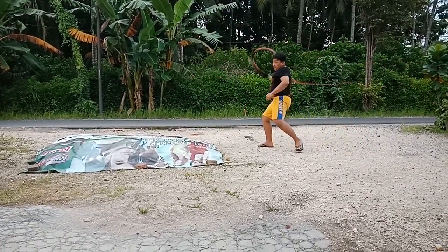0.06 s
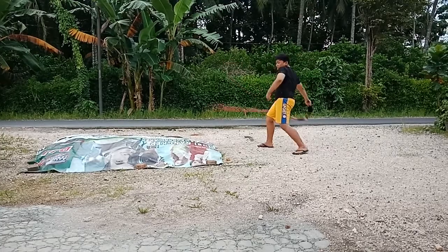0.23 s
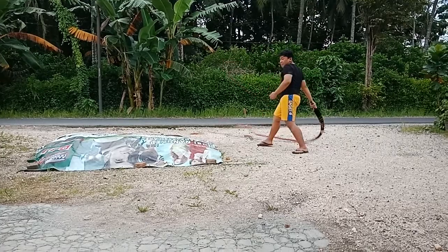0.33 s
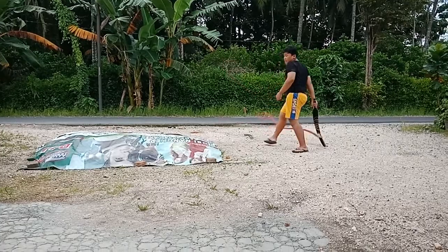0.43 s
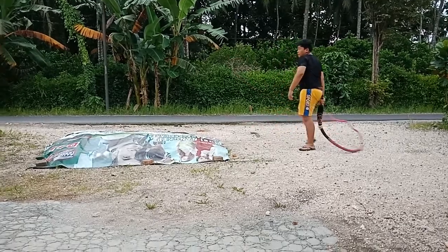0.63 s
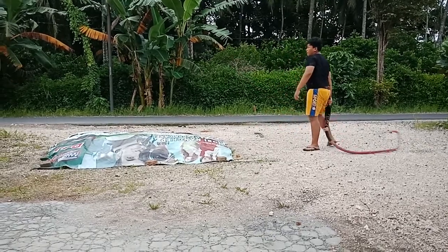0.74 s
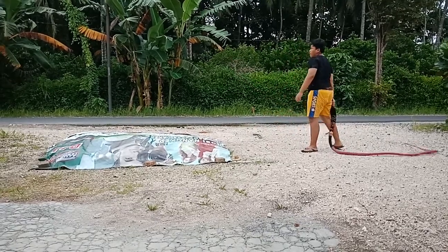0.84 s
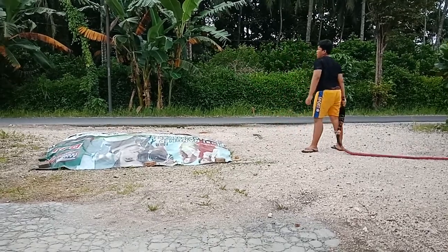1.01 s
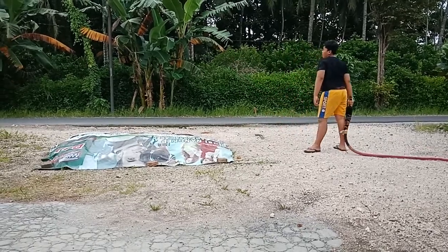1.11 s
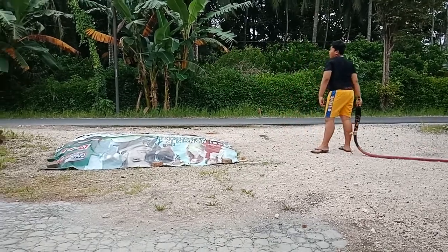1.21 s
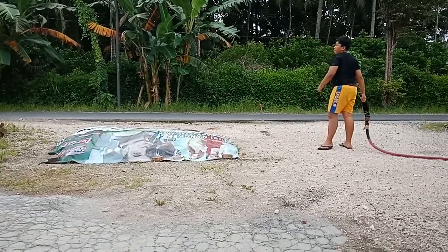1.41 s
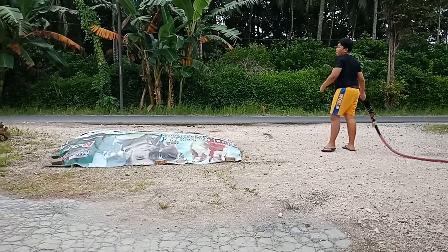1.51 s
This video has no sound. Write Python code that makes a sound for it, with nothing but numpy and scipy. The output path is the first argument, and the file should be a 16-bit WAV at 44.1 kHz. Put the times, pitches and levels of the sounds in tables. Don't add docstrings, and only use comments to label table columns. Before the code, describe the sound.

One loud whip crack in a gravel yard, short swish before, scattered echo and faint scuffs after

```python
import sys
import numpy as np
from scipy import signal
from scipy.io import wavfile
from scipy.ndimage import uniform_filter1d

SR = 44100
rng = np.random.default_rng(int(sys.argv[2]) if len(sys.argv) > 2 else 0)


def nominal_scale(level):
    x = np.asarray(level, float) / 20
    return 10 ** x


def wav_record(signal):
    frames = np.transpose(np.atleast_2d(signal))
    bounded = np.clip(frames, -1, 1)
    quanta = np.round(bounded * 32767).astype(np.int16)
    wavfile.write(sys.argv[1], SR, quanta)


N = 68355

# f/Hz, density/dB per Hz
BED_TONE = [(40, -29), (70, 6), (130, 3), (300, -1), (900, -9), (3300, -16), (4500, -21), (6500, -36.5)]
# f/Hz, left minus right/dB
PORT_TILT = [(60, 0.5), (200, -1), (700, -2), (1300, 1.5), (2400, -3), (4300, -13), (8000, -19),
             (14700, -10)]
# f/Hz, width/Hz, level/dB
EXHAUST_MODES = [(76, 27, -11.5), (110, 77, 12), (150, 26, 8), (176, 40, 7), (280, 15, -6.5), (394, 73, -5)]
# t/s, level/dB
ENGINE_LEVEL = [(0, -46.5), (.2, -49.5), (.3, -70), (.42, -58), (.48, -50.5), (1.0, -56.5), (1.2, -51.5),
                (1.55, -51)]
# t/s, length/s, level/dB, f/Hz, width/Hz
SCUFFS = [
    (0.025, 0.013, -43.5, 2780, 2530),
    (0.041, 0.11, -46, 2040, 2780),
    (0.192, 0.028, -43.5, 3430, 3300),
    (0.2011, 0.0097, -28.5, 2100, 3290),
    (0.213, 0.0093, -40.5, 797, 898),
    (0.845, 0.038, -48.5, 4050, 1000),
    (1.27, 0.032, -48.5, 730, 706),
    (1.307, 0.069, -49.5, 2380, 2430),
    (1.388, 0.064, -47, 2520, 2460),
    (1.47, 0.075, -54, 3200, 2540),
]
# t/s, level/dB, left minus right/dB
ECHOES = [
    (.2166, 8, 3),
    (.2186, 8, 0),
    (.2212, 4, 3),
    (.2226, 5, 0),
    (.2299, 9, 8),
    (.2310, 8, 8),
    (.2345, 6, 2),
    (.2385, 7, -5),
    (.2450, 2, 3),
]
# t/s, level/dB
SCATTER_FADE = [(.216, -8), (.242, -12.5), (.256, -16), (.326, -25), (.43, -24), (.508, -24.5),
                (.654, -36.5), (.808, -43), (1.0, -58)]
# f/Hz, density/dB per Hz
SCATTER_TONE = [(150, -25), (400, -10.5), (833, -9), (2300, -0.5), (4000, -13.5), (6500, -28),
                (9000, -21.5), (15000, -30)]
BANDS_HZ = 40 * 2 ** np.arange(0, 8.7, 1 / 3)

SIDES = np.array([[1], [-1]])
TIME = np.arange(N) / SR
CRACK_S = .2158
SINCE_CRACK = TIME - CRACK_S
AFTER_CRACK = np.maximum(SINCE_CRACK, 0)


def level(x, db):
    return x * nominal_scale(db) / np.sqrt(np.mean(x ** 2))


def curve(table):
    return np.interp(TIME, *np.array(table, float).T)


def tone(table, hz):
    table_hz, table_db = np.array(table).T
    return np.interp(np.log(hz), np.log(table_hz), table_db)


def band(x, hz, width, order=1):
    edges = [max(hz - width / 2, hz / 4), min(hz + width / 2, .45 * SR)]
    return signal.sosfilt(signal.butter(order, edges, "band", fs=SR, output="sos"), x)


def walk(rate):
    hold = int(SR / rate)
    steps = np.repeat(rng.standard_normal(N // hold + 1), hold)
    return 0.54 * uniform_filter1d(uniform_filter1d(steps, hold), hold)[:N]


def grit(grain_db):
    return level(nominal_scale(grain_db * rng.exponential(size=(2, N))), 0)


def ports(hz, grain=None):
    if grain is None:
        settle = 4096
        noise = rng.standard_normal((2, N + settle))
        mid, side = band(noise, hz, hz * .23, order=2)[:, settle:]
    else:
        mid, side = band(rng.standard_normal((2, N)) * grain, hz, hz * 0.24, order=2)
    alike = 1 / (1 + (hz / 420) ** 2)
    pair = np.sqrt(1 + alike) * mid + SIDES * np.sqrt(1 - alike) * side
    return pair * nominal_scale(SIDES * tone(PORT_TILT, hz) / 2)


def duck(db):
    release_s = 0.53
    return nominal_scale(db * (SINCE_CRACK > 0) * np.exp(-AFTER_CRACK / release_s))


def bed():
    swell = walk(2.64)
    out = 0
    for hz in BANDS_HZ[:23]:
        flicker_db = 1.9 * swell + 2.44 * walk(10)
        out = out + nominal_scale(tone(BED_TONE, hz) + flicker_db) * ports(hz)
    return level(out, -45.5) * duck(-17)


def insects():
    shrill = band(rng.standard_normal((2, N)), 4350, 600, order=2)
    return level(shrill, -70) * nominal_scale(2.0 * walk(23) - 3 * SIDES)


def engine():
    firing_hz, wobble, firing_scatter_db = 37.8, .012, 3
    turns = np.cumsum(firing_hz * (1 + wobble * walk(11))) / SR
    strength = nominal_scale(firing_scatter_db * rng.standard_normal(200))
    pulses = np.diff(np.floor(turns), prepend=0) * strength[turns.astype(int)]
    pipe = 0
    for hz, width, db in EXHAUST_MODES:
        pipe = pipe + nominal_scale(db) * level(band(pulses, hz, width, order=2), 0)
    return level(pipe, 0) * nominal_scale(curve(ENGINE_LEVEL)) * nominal_scale(-.6 * SIDES)


def whine():
    whine_hz, swell_s, swell_length_s = 264.6, .93, 0.18
    phase = 2 * np.pi * np.cumsum(whine_hz * (1 + 0.001 * walk(19))) / SR
    swell = 0.43 + np.exp(-((TIME - swell_s) / swell_length_s) ** 4)
    octave = nominal_scale(1) * (swell - .3) * np.sin(2 * phase)
    return nominal_scale(-59.5) * (np.sin(phase) + octave) * swell


def self_noise():
    wind = band(rng.standard_normal(N), 32, 25, order=2) * SIDES
    hiss = band(rng.standard_normal((2, N)), 11000, 11000)
    return level(wind, -62.5) * duck(-7) + level(hiss, -74.5)


def scuffs():
    out = np.zeros((2, N))
    noise = rng.standard_normal((2, N)) * grit(2.3)
    for s, length, db, hz, width in SCUFFS:
        near = slice(max(int((s - 2 * length) * SR), 0), int((s + 2 * length) * SR))
        shape = np.exp(-(2 * (TIME[near] - s) / length) ** 2)
        out[:, near] += level(band(noise[:, near], hz, width, order=4), db) * shape
    return out * nominal_scale(-1.5 * SIDES)


def shock():
    length_s = .00045
    out = np.zeros((2, N))
    apart = rng.uniform(0, .0003, (len(ECHOES) + 1, 2))
    for (s, db, pan), lag in zip([(CRACK_S, 12, 0), *ECHOES], apart):
        lag = lag[:, None] * (s > CRACK_S)
        u = (TIME - s - lag) / length_s
        n_wave = (1 - 2 * u) * (u > 0) * (u < 1)
        out += nominal_scale(db + pan * SIDES / 2) * n_wave
    return band(out, 2700, 3100, order=2) + thump()


def thump():
    thump_hz, thump_db, t60_s = 94.4, -2, 0.068
    sweep = 2 * np.pi * thump_hz * (AFTER_CRACK + 0.001 * (1 - np.exp(-AFTER_CRACK / .008)))
    fade = nominal_scale(thump_db - 60 * AFTER_CRACK / t60_s) * (AFTER_CRACK > 0)
    left_lag = np.array([[1.8], [0]])
    return np.sin(sweep - left_lag) * fade * nominal_scale(np.array([[-8], [0]]))


def scatter():
    air_db_per_s_khz, early_bass_db, early_bass_s, rise_s = -3, 18.5, 0.0072, .0003
    out, grain = 0, grit(2.5)
    for hz in BANDS_HZ[5:]:
        full = early_bass_db * np.exp(-AFTER_CRACK / early_bass_s) / (1 + (hz / 700) ** 2)
        air = air_db_per_s_khz * hz / 1000 * (AFTER_CRACK - .2)
        db = tone(SCATTER_TONE, hz) + air + full + walk(40)
        out = out + nominal_scale(db) * ports(hz, grain)
    return 4.28 * out * nominal_scale(curve(SCATTER_FADE)) * np.clip(SINCE_CRACK / rise_s, 0, 1)


def scene():
    return bed() + insects() + engine() + whine() + scuffs() + shock() + scatter()


def band_limit(x):
    return signal.sosfilt(signal.butter(12, 15330, fs=SR, output="sos"), x)


def record(dry):
    x = signal.sosfilt(signal.butter(4, 51, "high", fs=SR, output="sos"), dry)
    cut = signal.sosfilt(signal.butter(10, 6330, fs=SR, output="sos"), x)
    x = cut + nominal_scale(-30.5) * (x - cut) + self_noise()
    x = x / (1 + np.abs(x) ** 8.) ** (1 / 8.)
    x = signal.sosfilt(signal.ellip(4, .2, 30, 17000, fs=SR, output="sos"), x)
    mix = np.clip(x, -1, 1)
    return band_limit(mix)


dry = scene()
out = record(dry)
wav_record(out)
```